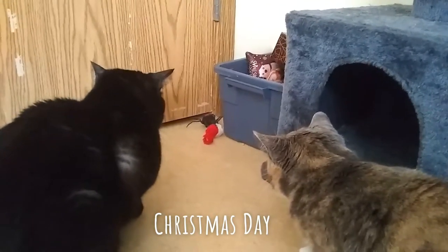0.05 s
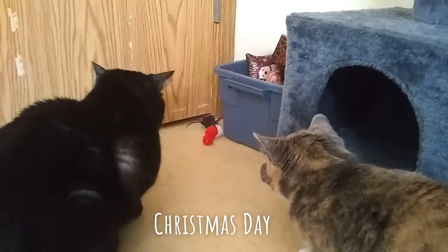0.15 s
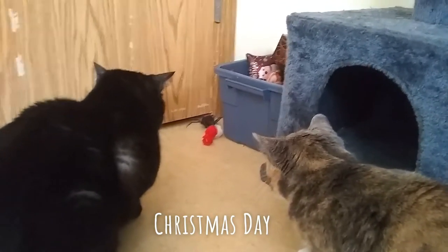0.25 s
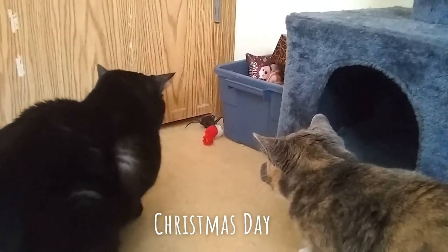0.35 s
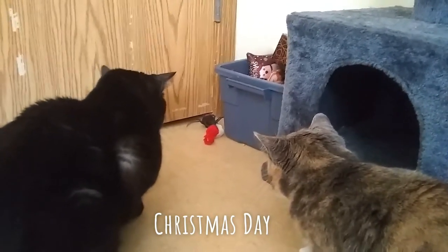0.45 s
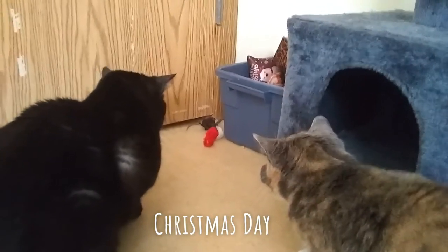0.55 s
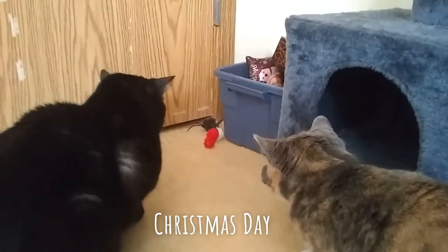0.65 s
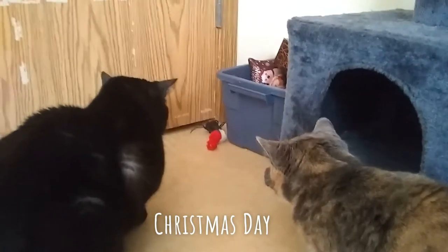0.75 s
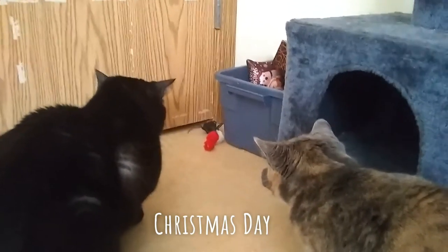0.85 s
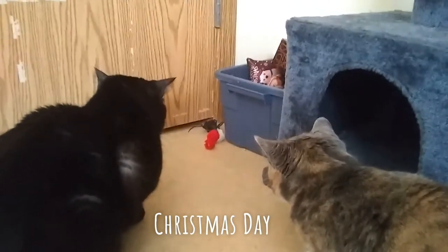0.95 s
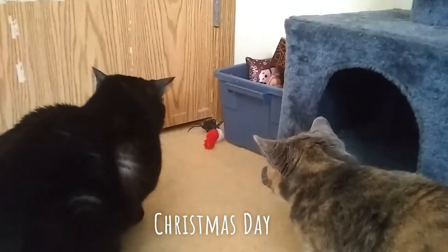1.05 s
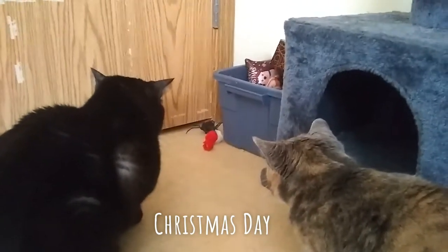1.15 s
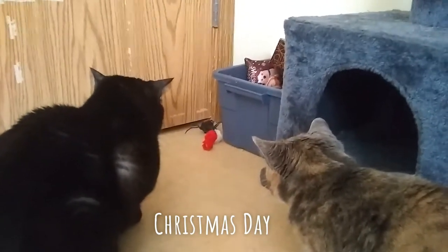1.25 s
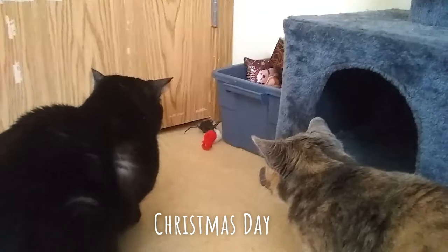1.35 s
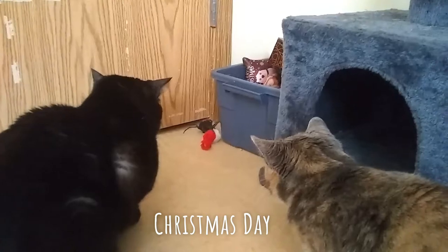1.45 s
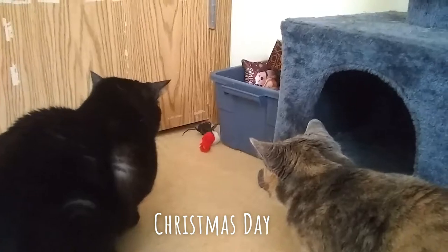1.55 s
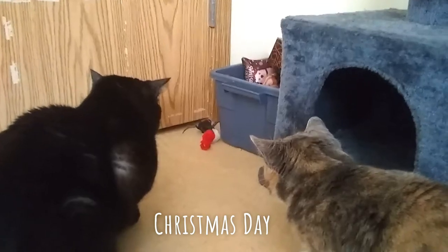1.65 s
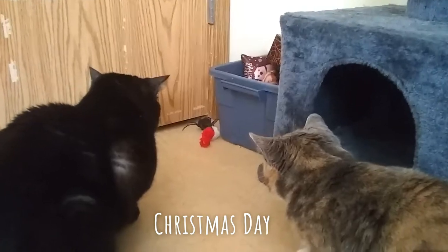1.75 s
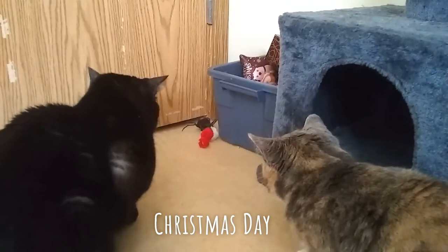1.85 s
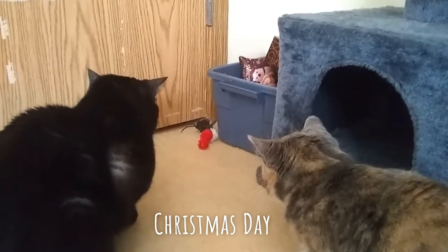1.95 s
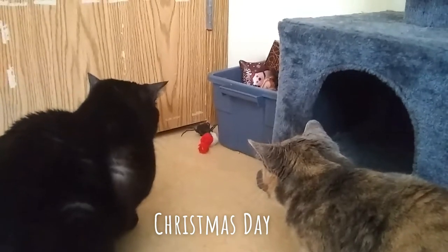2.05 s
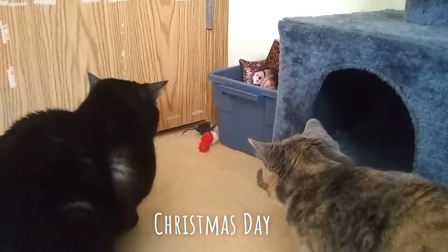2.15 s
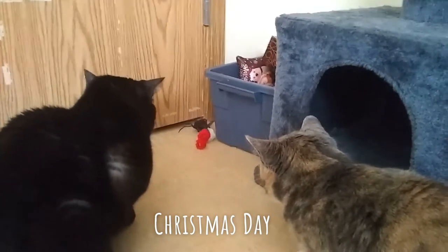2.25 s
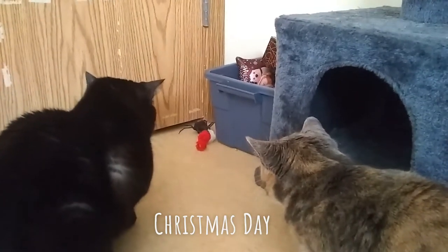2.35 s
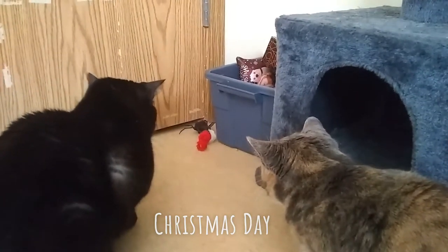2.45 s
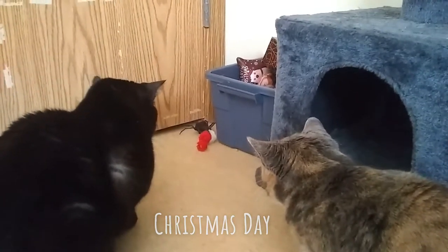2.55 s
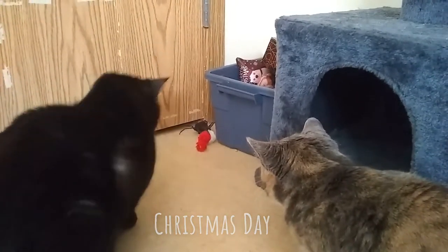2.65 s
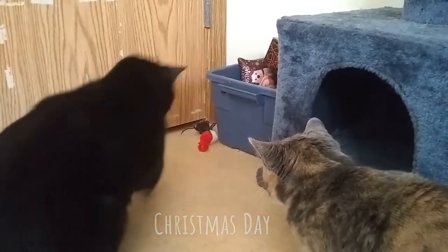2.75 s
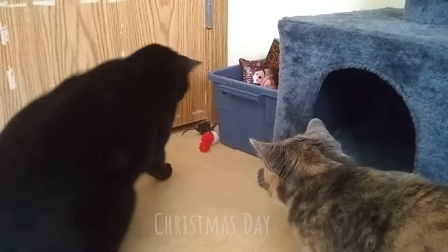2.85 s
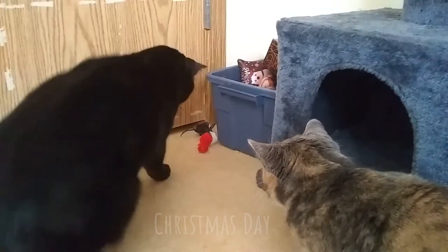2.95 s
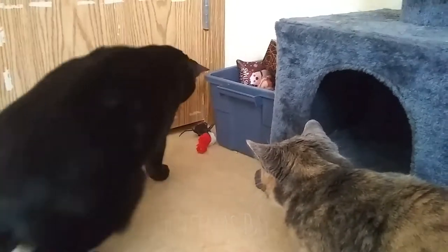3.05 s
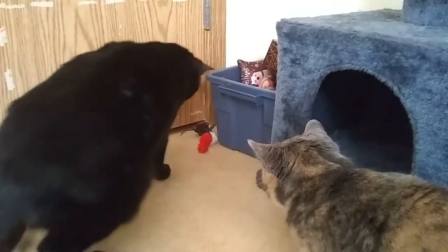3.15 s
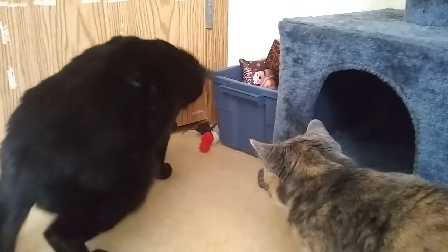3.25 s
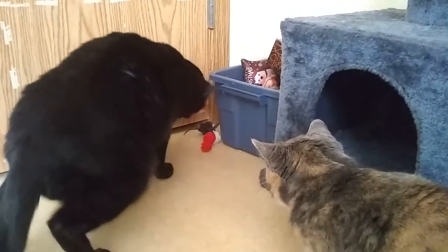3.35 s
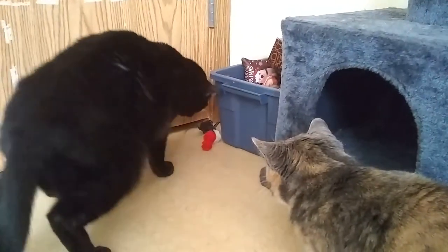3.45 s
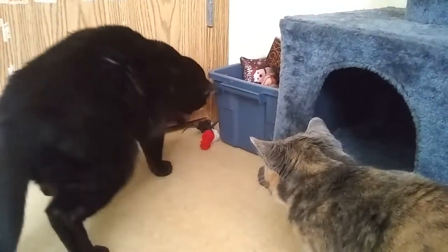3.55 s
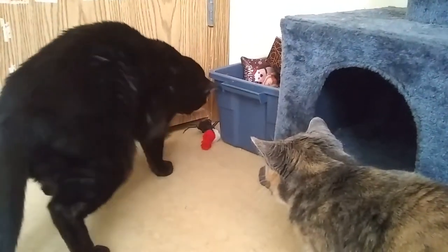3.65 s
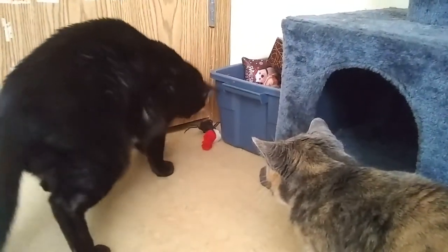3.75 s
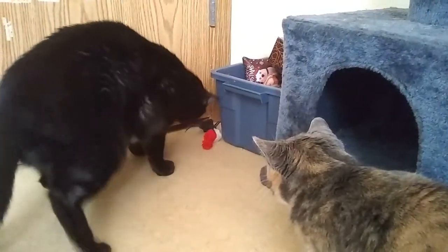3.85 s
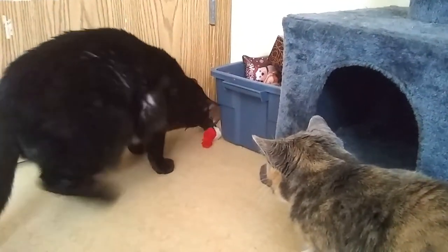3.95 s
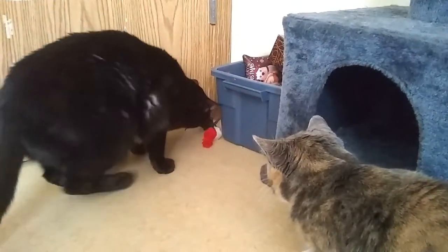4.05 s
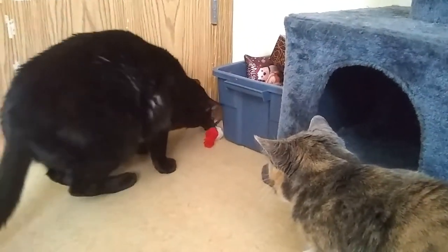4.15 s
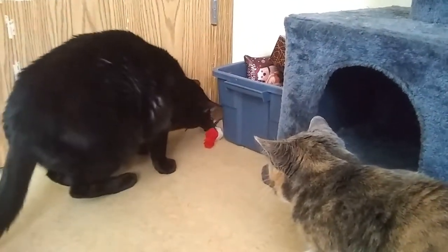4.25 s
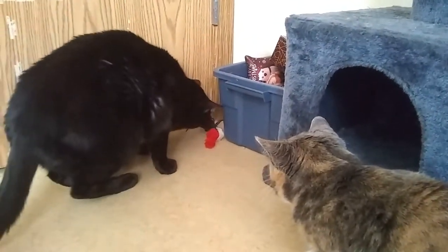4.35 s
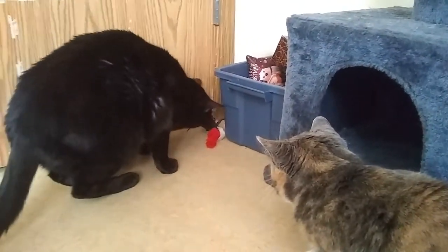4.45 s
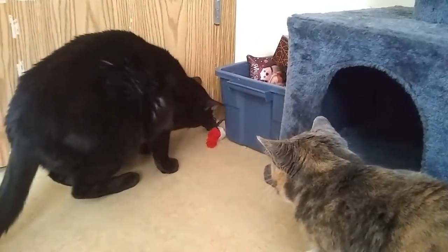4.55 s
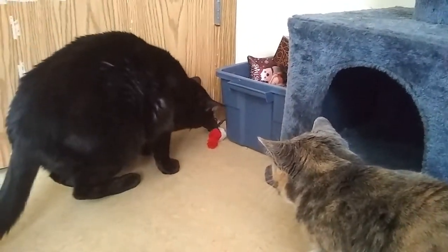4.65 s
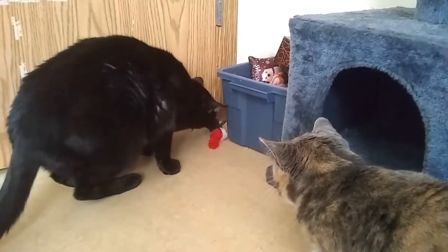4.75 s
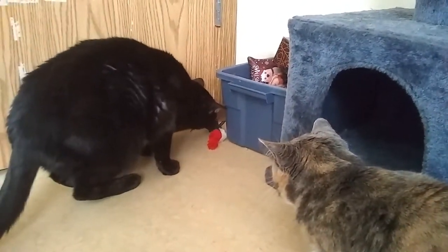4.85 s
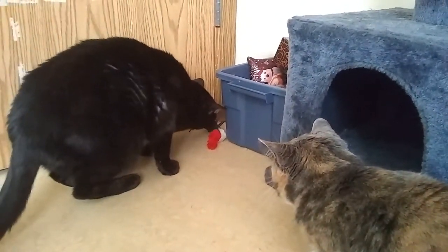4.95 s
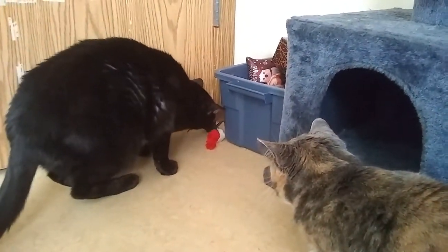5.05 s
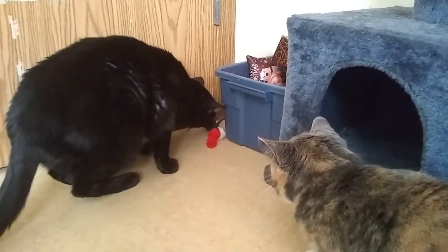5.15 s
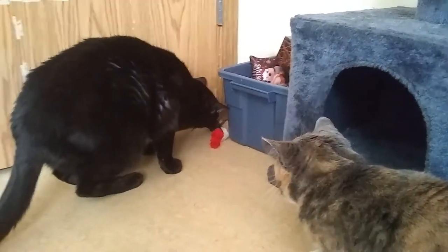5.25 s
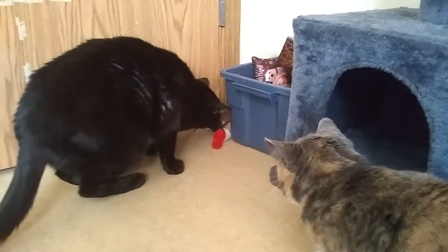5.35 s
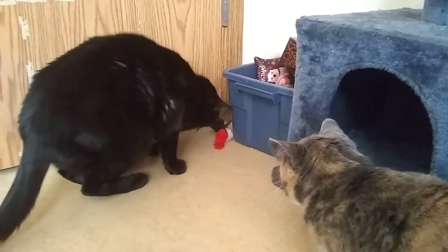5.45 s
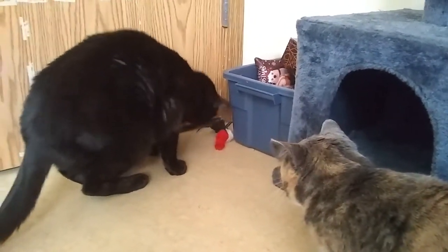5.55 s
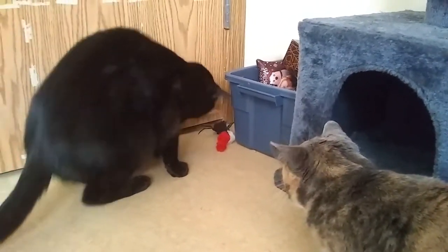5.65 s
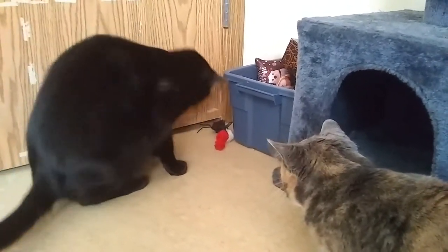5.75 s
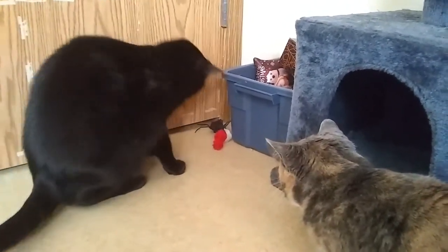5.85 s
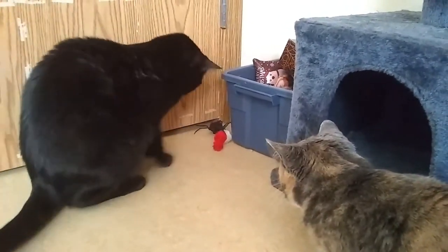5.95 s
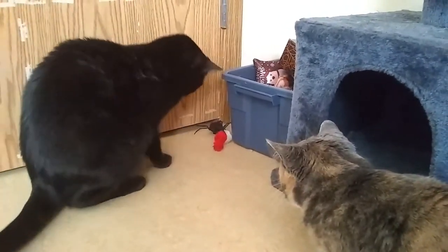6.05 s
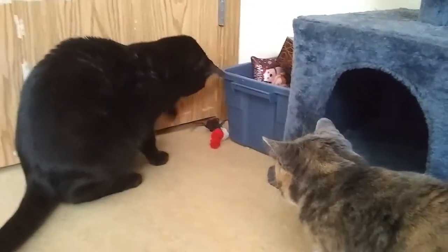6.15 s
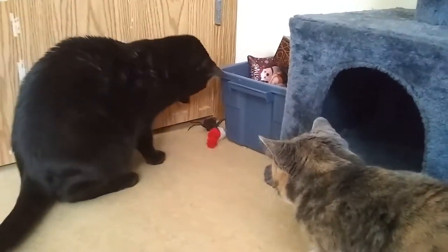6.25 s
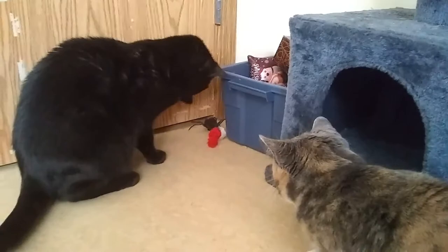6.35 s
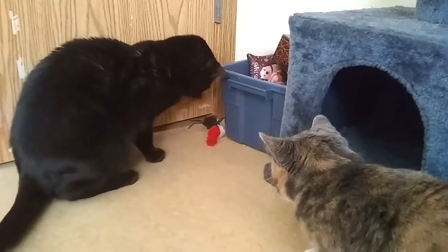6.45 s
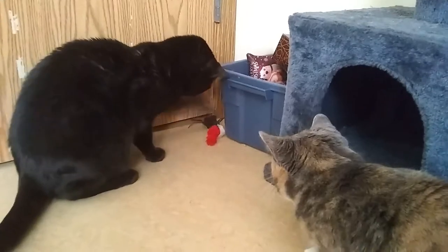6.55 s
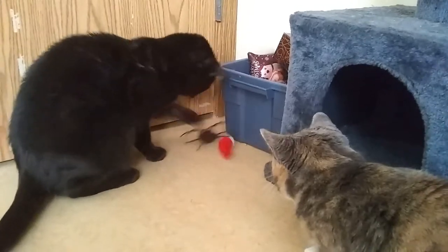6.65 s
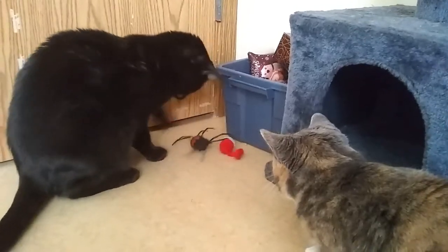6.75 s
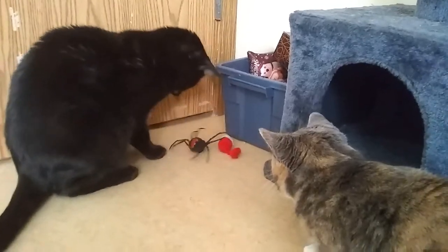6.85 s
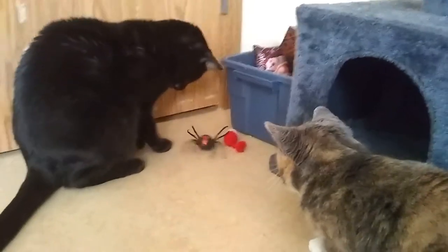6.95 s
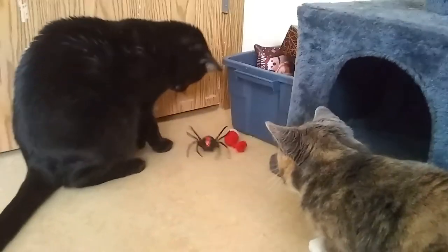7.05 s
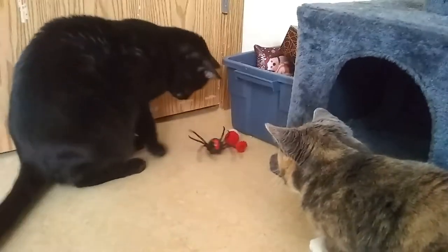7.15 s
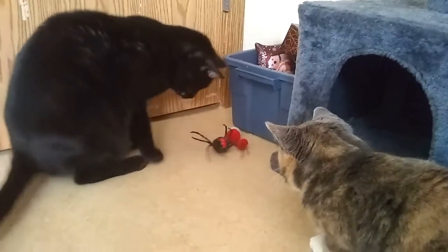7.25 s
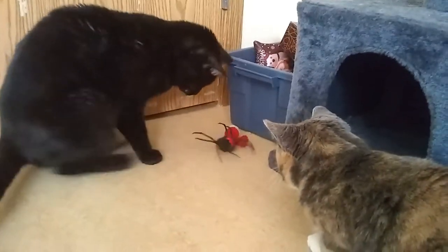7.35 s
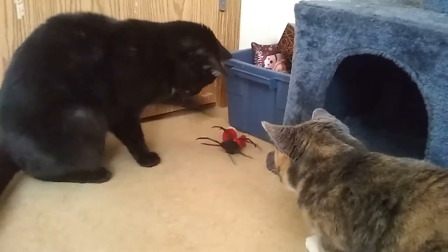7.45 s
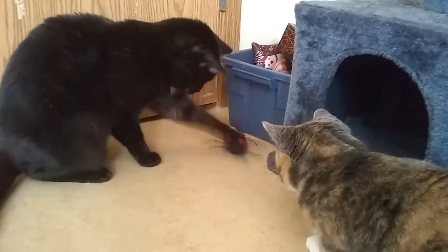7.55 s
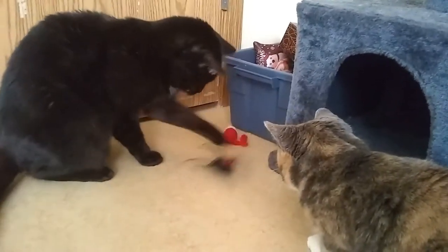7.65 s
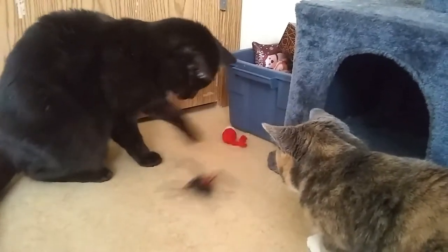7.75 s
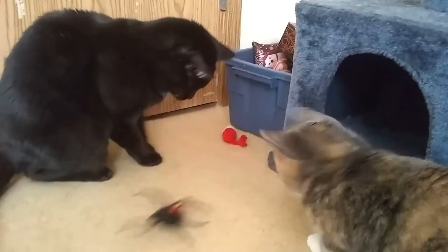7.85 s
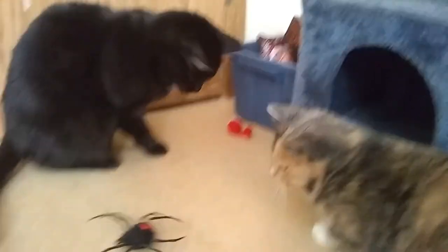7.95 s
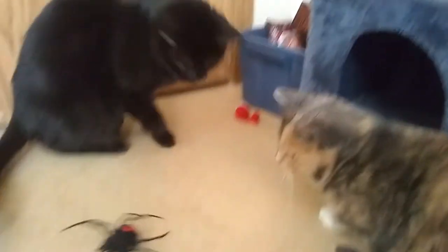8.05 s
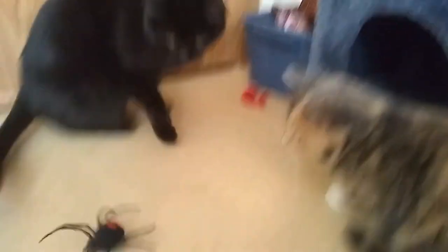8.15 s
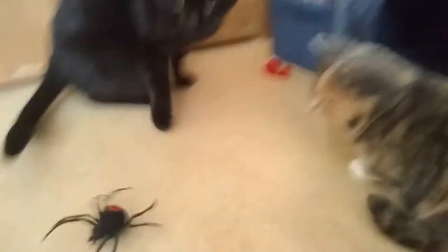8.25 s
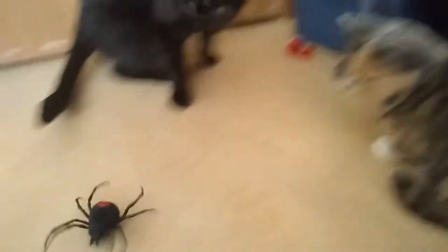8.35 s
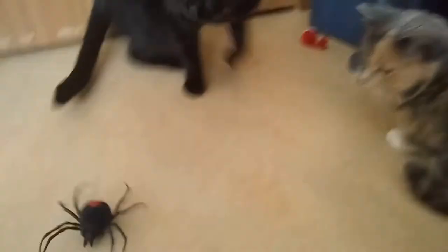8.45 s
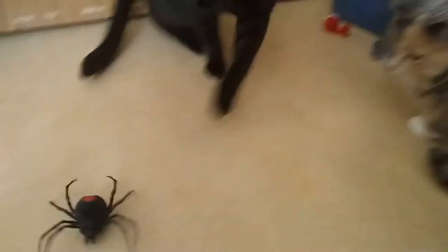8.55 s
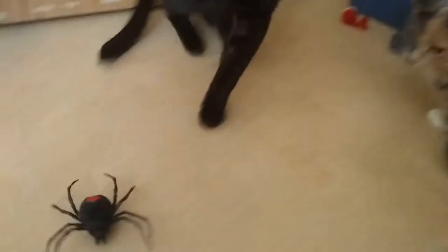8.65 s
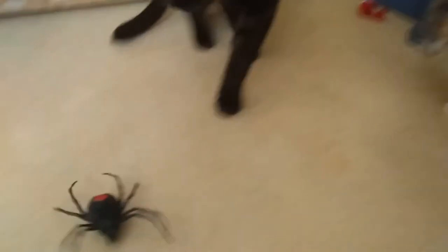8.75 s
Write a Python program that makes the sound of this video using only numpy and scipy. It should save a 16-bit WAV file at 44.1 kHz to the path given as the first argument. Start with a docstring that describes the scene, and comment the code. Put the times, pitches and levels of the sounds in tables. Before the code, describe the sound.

Indoors in a small room, a battery-driven toy whirrs constantly with fast, gritty plastic gears that surge unevenly. Its legs tap and rub lightly on a wooden door, sometimes snapping free. A paw knocks it into the door with a sharp clack and short woody thud; then it rattles more loosely, is flicked away, and crosses right to left towards the close stereo microphone.

```python
"""A motorised toy spider scrabbles at a wooden door: motor hum, whirring gears that surge with each stride and
lurch, legs that tap and rub the wood and now and then snap free. At 6.65 s a cat's paw knocks it into the door:
a filtered-noise drag, a juddering shell, a thud of panel modes. Its freed linkage then chatters ever looser; at
7.7 s a paw flicks it away, and it crosses from right to left and comes close, whirring louder.
Room air and a steady appliance hum lie underneath throughout; a stereo widener spreads the toy."""
import sys
import numpy as np
from scipy import signal
from scipy.fft import rfft, irfft, next_fast_len
from scipy.io import wavfile
from scipy.ndimage import map_coordinates

SR = 44100
rng = np.random.default_rng(int(sys.argv[2]) if len(sys.argv) > 2 else 0)


def generate_wav(sig):
    """Save sig (samples, or channels by samples) to the path in sys.argv[1] as 16-bit PCM at SR."""
    pcm = np.round(np.clip(np.atleast_2d(sig).T, -1, 1) * 32767).astype(np.int16)
    wavfile.write(sys.argv[1], SR, pcm)


N = 388080
TIME = np.arange(N) / SR


def amp(db):
    """Decibels to gain."""
    return 10 ** (np.asarray(db) / 20)


def unit(x):
    """Scale to rms 1."""
    return x / np.sqrt(np.mean(x ** 2) + 1e-20)


def along(points, hz):
    """Read (frequency, value) points on a log frequency axis."""
    f, v = np.transpose(points)
    return np.interp(np.log(hz + 1), np.log(f + 1), v)


def curves(rows):
    """One value per sample for each column after the time."""
    s, *cols = np.transpose(rows)
    return [np.interp(TIME, s, c) for c in cols]


def wobble(rate):
    """A smooth random curve, rate knots a second."""
    return map_coordinates(rng.standard_normal(int(N * rate / SR) + 4), [TIME * rate])


def filtered(x, response):
    """x times a complex response of frequency."""
    m = next_fast_len(N + SR // 2)
    return irfft(rfft(x, m) * response(np.fft.rfftfreq(m, 1 / SR)), m)[..., :N]


def ring(x, spectrum, low_hz, size=2048):
    """x through a causal (minimum-phase) body with this spectrum, which radiates little below low_hz."""
    hz = np.fft.rfftfreq(size, 1 / SR)
    radiated = hz ** 2 / (hz ** 2 + low_hz ** 2)
    cepstrum = irfft(np.log(amp(along(spectrum, hz)) * radiated + 1e-6))
    # folding the cepstrum forward in time makes the response causal
    cepstrum[1:size // 2] *= 2
    cepstrum[size // 2 + 1:] = 0
    response = irfft(np.exp(rfft(cepstrum)))
    return signal.fftconvolve(x, response / np.linalg.norm(response))[:N]


def impacts(turns, scatter, spread_db, count):
    """count loose contacts per shaft turn, uneven in time and strength."""
    marks = np.arange(int(turns[-1] * count)) / count
    late, size = rng.standard_normal((2, len(marks)))
    at = np.interp(marks + scatter * late, turns, np.arange(N)).astype(int)
    strength = amp(spread_db * np.minimum(size, 2)) * rng.choice([-1, 1], len(at))
    return unit(np.bincount(at, strength, N))


def blows(rows, t60, scuff):
    """Each contact is a sharp push and a brief scuff of dying noise."""
    out, t = np.zeros(N + SR), np.arange(SR // 10) / SR
    for s, db in rows:
        push = scuff * unit(rng.standard_normal(len(t)) * amp(-60 * t / t60)) / np.sqrt(len(t))
        push[0] += 1
        out[round(s * SR):][:len(t)] += amp(db) * push
    return out[:N]


def swells(rows, rise, life):
    """Power of short swells that rise quickly and die away."""
    power, t = np.zeros(N), np.arange(SR // 5) / SR
    for s, db in rows:
        power[min(round(s * SR), N - 1)] += amp(db) ** 2
    return np.abs(signal.fftconvolve(power, np.exp(-t / life) * (1 - np.exp(-t / rise)))[:N])


def sum_difference(pair):
    """Mid and side to left and right, or twice the reverse."""
    return np.array([pair[0] + pair[1], pair[0] - pair[1]])


def aside(x, side_db):
    """A source's share of the side signal."""
    return np.array([np.zeros(N), amp(side_db) * x])


# reverb decay of the room: (frequency [Hz], t60 [s])
ROOM_DECAY = [(200, 0.28), (3000, 0.1), (12000, 0.14)]


def room(x, wet_db, size=16384):
    """Direct sound in the middle and diffuse reflections that keep changing, as mid and side."""
    hop = size // 2
    starts = np.arange(0, N + hop, hop)
    padded = np.pad(x, (hop, 2 * size))
    pieces = padded[starts[:, None] + np.arange(size)] * np.sin(np.pi * np.arange(size) / size)
    # each overlapping piece gets its own noise tail
    hz, t, z = signal.stft(rng.standard_normal((len(starts), 2, hop)), SR, nperseg=256)
    decay = amp(-60 * t / along(ROOM_DECAY, hz)[:, None])
    tails = signal.istft(z * decay, SR, nperseg=256)[1]
    tails = tails / np.linalg.norm(tails, axis=2, keepdims=True)
    echoes = signal.fftconvolve(pieces[:, None], tails, axes=2)
    wet = np.zeros((2, N + 4 * size))
    for start, echo in zip(starts, echoes):
        wet[:, start:start + echo.shape[1]] += echo
    return np.array([x, np.zeros(N)]) + amp(wet_db) * wet[:, hop:hop + N]


# nominal speed of the motor shaft: (time [s], turns per second [Hz])
MOTOR_SPEED = [(0, 145), (.5, 147), (1.9, 143.9), (2.6, 147.6), (3.1, 143.6), (4.4, 147.8), (5.2, 147.4),
               (6, 144), (6.6, 143.6), (6.95, 155.5), (7.4, 151.4), (7.8, 148), (8.2, 143.5), (8.8, 144.8)]


def motor_turns():
    """The shaft's running count of turns, its speed slightly unsteady; it drives every moving part."""
    return np.cumsum(curves(MOTOR_SPEED)[0] * (1 + .004 * wobble(12))) / SR


# the motor is geared down to the legs, and the body rocks once in a few strides
TURNS_PER_STRIDE, TURNS_PER_ROCK = 12.81, 50.8
STRIDE_PHASE, ROCK_PHASE = 0.52, 0.61  # share of a cycle at which the load peaks


def strides(turns, scatter):
    """The time of each stride, a little uneven."""
    marks = (np.arange(int(turns[-1] / TURNS_PER_STRIDE)) + STRIDE_PHASE) * TURNS_PER_STRIDE
    return np.interp(marks + scatter * TURNS_PER_STRIDE * rng.standard_normal(len(marks)), turns, TIME)


SURGE_DB, ROCK_DB = -46, 8  # a stride's relative load on the gears, its swing with the rocking
# the gears bite as the toy lurches: (time [s], relative level [dB])
LURCHES = [(0.136, -35), (0.246, -38), (0.584, -30), (0.71, -34), (0.967, -31), (1.131, -34), (1.472, -37),
           (1.557, -37), (2.077, -34), (2.155, -33.5), (2.25, -36), (2.378, -43), (2.776, -34),
           (3.013, -32.5), (3.108, -29.5), (3.407, -31.5), (3.684, -31.5), (3.808, -34), (4.012, -34.5),
           (4.384, -33.5), (4.526, -33.5), (4.637, -29.5), (4.713, -34), (4.882, -37), (5.172, -32),
           (5.297, -28), (5.507, -31.5), (5.723, -40), (5.846, -31.5), (5.922, -37), (6.215, -35),
           (6.369, -33), (6.476, -29), (7.114, -31), (7.254, -33.5), (7.413, -34), (7.515, -30.5),
           (7.779, -31.5), (7.85, -33.5), (7.916, -33), (8.179, -33), (8.246, -32), (8.414, -40),
           (8.598, -43), (8.687, -37)]


def gear_load(turns):
    """Surges (s, dB): a light one per stride, swinging as the body rocks, and the harder lurches."""
    rock = np.cos(2 * np.pi * (turns / TURNS_PER_ROCK - ROCK_PHASE))
    steps = [(s, SURGE_DB + ROCK_DB * rock[int(s * SR)]) for s in strides(turns, scatter=0.13)]
    return steps + list(LURCHES)


# colour of the plastic shell: (frequency [Hz], relative level [dB])
SHELL_COLOUR = [(900, -14), (1500, -12.5), (2100, -6), (2600, 1), (2950, -1.75), (3300, -10.5), (3750, -7),
                (4650, -9), (5400, -6), (6300, -7), (7200, -6.5), (8700, -11.5), (9900, -8), (10550, -7),
                (11100, -8.5), (12000, -11.5), (13300, -17), (14500, -30)]
# ringing of the nook between door and storage bin: (frequency [Hz], width [Hz], gain [ratio])
NOOK_MODES = [(2570, 13, 0.15), (2640, 11, 0.39), (2905, 7.2, 0.93), (2998, 12, 1.35), (3030, 26, 0.61),
              (3477, 77, 0.82)]


def gear_noise(turns, spread_db, rub):
    """Teeth rattle and rub in the shell, loaded once a turn; the nook rings, fading out after the knock."""
    load = amp(1.6 * np.cos(2 * np.pi * turns) + 2.8 * wobble(150))
    rattle = impacts(turns, scatter=.06, spread_db=spread_db, count=7)
    drive = load * (rattle + rub * rng.standard_normal(N))
    shell = unit(ring(drive, SHELL_COLOUR, low_hz=866))

    def resonances(hz):
        return sum(g * 1j * hz * w / (c * c - hz * hz + 1j * hz * w) for c, w, g in NOOK_MODES)
    return shell + filtered(shell, resonances) * np.clip((KNOCK[0][0] - TIME) / 0.51 + 1, 0, 1)


# steady whirr, louder as the toy nears: (time [s], relative level [dB])
WHIRR_LEVEL = [(0.05, -46.5), (0.82, -45.5), (1.62, -46.5), (3.1, -46), (3.55, -47.5), (3.9, -45.5),
               (4.28, -49), (4.55, -47.5), (5.6, -46), (7.12, -45), (7.37, -44), (8.07, -45.5),
               (8.4, -43.5), (8.78, -41)]
WHIRR_DB = 6  # lift of the whole whirr over that table
# the highest fizz, dulled while the cat leans over the toy: (time [s], level relative to the whirr [dB])
FIZZ_LEVEL = [(0, -3.5), (3.2, -1.5), (4.2, -4), (5.4, -5.5), (6.2, -3.5), (7.5, -5), (8.1, -1),
              (8.8, -2.5)]


def gearbox(turns):
    """The big gears whirr and surge with each lurch; the smaller ones hiss and fizz more evenly."""
    steady = amp(curves(WHIRR_LEVEL)[0] + WHIRR_DB) ** 2
    surge = swells(gear_load(turns), rise=0.0022, life=0.012)

    def above(hz, edge):
        return 1 / (1 + (edge / (hz + 1)) ** 8)
    whirr = filtered(gear_noise(turns, spread_db=4.0, rub=0.93), lambda hz: np.sqrt(1 - above(hz, 4380)))
    hiss = filtered(gear_noise(turns, spread_db=5.0, rub=0.68),
                    lambda hz: np.sqrt(above(hz, 3670) * (1 - above(hz, 7020))))
    fizz = filtered(gear_noise(turns, spread_db=5.0, rub=1.14), lambda hz: np.sqrt(above(hz, 7940)))
    whirr = whirr * np.sqrt(steady + 0.73 * surge)
    hiss = hiss * np.sqrt(steady + 0.13 * surge) * amp(1.6 * wobble(160))
    fizz = fizz * np.sqrt(steady + 0.21 * surge) * amp(curves(FIZZ_LEVEL)[0] + 2)
    direct = amp(-6) * (whirr + hiss + fizz)
    # the far side of the body is heard only by way of the side walls
    wash = amp(-6.5) * np.sqrt(steady + 0.56 * surge) * gear_noise(turns, spread_db=-2.0, rub=0.88)
    return room(direct, wet_db=-2.5) + aside(wash, side_db=1.0)


# the linkage is nearly still while the door holds the legs, and shakes loose once they run free
HELD_DB, FREE_DB, LOOSEN_S = -71, -35, 0.33  # relative levels, time to loosen
# the loudest ticks of the linkage: (time [s], relative level [dB])
HARD_TICKS = [(7.6572, -20), (8.4224, -19), (8.438, -20), (8.5151, -19), (8.6105, -15.5), (8.6935, -18),
              (8.7491, -19)]


def linkage(turns, ring_hz, life, spread_db):
    """A loose link ticks in one short plastic resonance, now and then hard; it grows with whirr and lurch."""
    t = np.arange(SR // 100) / SR
    tick = np.sin(2 * np.pi * ring_hz * t) * (t * t) * np.exp(-t / life)
    contacts = impacts(turns, scatter=0.092, spread_db=spread_db, count=7)
    chatter = unit(signal.fftconvolve(contacts, tick)[:N])
    hard = signal.fftconvolve(blows(HARD_TICKS, t60=.01, scuff=0), tick / np.abs(tick).max())[:N]
    free = np.clip((TIME - KNOCK[0][0]) / LOOSEN_S, 0, 1)
    whirr_db = curves(WHIRR_LEVEL)[0]
    level_db = HELD_DB + (FREE_DB - HELD_DB) * free + 1.8 * (whirr_db - whirr_db.mean())
    lurch = swells(LURCHES, rise=.002, life=0.0089) / amp(whirr_db + WHIRR_DB) ** 2
    return amp(level_db) * np.sqrt(0.19 + 0.12 * lurch) * chatter + amp(5) * hard


# caught legs snapping free: (time [s], relative level [dB])
LEG_SNAPS = [(0.4203, -36), (0.5563, -33), (3.0127, -30.5), (3.4082, -41), (4.6385, -36), (4.6525, -39),
             (4.886, -38), (4.9686, -34.5), (5.133, -40), (5.506, -35.5), (5.659, -42), (5.722, -37),
             (6.0205, -30.5), (6.1087, -30.5)]
# the cat's paw strikes the shell, or the shell strikes the door: (time [s], relative level [dB])
SWATS = [(6.6258, -30), (6.6522, -21.5), (7.5956, -29.5), (7.656, -28.5)]
# colour of a plastic snap: (frequency [Hz], relative level [dB])
SNAP_COLOUR = [(900, -13), (3000, 1), (4500, -5), (10000, -5.5), (14000, -18)]
SNAP_RISE_S, SNAP_DB = .0008, -2.5  # time constant of the burst, its level against the tables


def snaps(rows):
    """Plastic slips over an edge: a rounded noise burst of a few milliseconds."""
    out, t = np.zeros(N + SR), np.arange(SR // 50) / SR
    swell = t * t * np.exp(-t / SNAP_RISE_S)
    for s, db in rows:
        out[round(s * SR):][:len(t)] += amp(db + SNAP_DB) * swell / swell.max() * rng.standard_normal(len(t))
    return ring(out[:N], SNAP_COLOUR, low_hz=700)


# kicks of the legs against the door, about one a stride: (time [s], relative level [dB])
KICKS = [(0.018, -41), (0.096, -53), (0.161, -50), (0.224, -46), (0.34, -47.5), (0.492, -51), (0.714, -46),
         (0.791, -41), (0.883, -41.5), (0.96, -60), (1.008, -48.5), (1.102, -41), (1.289, -51),
         (1.406, -59), (1.459, -44), (1.557, -49), (1.608, -48.5), (1.75, -47), (1.874, -47), (1.943, -45),
         (2.041, -46), (2.083, -49), (2.125, -46.5), (2.203, -46.5), (2.253, -45.5), (2.305, -47),
         (2.435, -44), (2.502, -50), (2.64, -45.5), (2.731, -40.5), (2.854, -48), (2.933, -45),
         (2.999, -52), (3.066, -46.5), (3.19, -51), (3.262, -46.5), (3.356, -44.5), (3.446, -42),
         (3.498, -54), (3.556, -46), (3.641, -57), (3.754, -44.5), (3.942, -45), (4.0, -44.5), (4.093, -41),
         (4.192, -42.5), (4.305, -51), (4.441, -55), (4.531, -52), (4.611, -50), (4.689, -52), (4.785, -48),
         (4.84, -43.5), (4.888, -43.5), (5.039, -46), (5.153, -49), (5.251, -49), (5.311, -48.5),
         (5.38, -48), (5.52, -50), (5.564, -47.5), (5.661, -41), (5.744, -44), (5.854, -45.5), (5.901, -46),
         (5.946, -42.5), (6.093, -45), (6.171, -60), (6.274, -44), (6.476, -48.5)]
# the door's short woody notes under a kick: (frequency [Hz], relative level [dB])
KICK_NOTES = [(560, -13), (630, -3), (705, -1), (790, -12)]
# colour of the door under light legs: (frequency [Hz], relative level [dB])
LIGHT_COLOUR = [(100, -18.5), (230, -4), (400, -1), (520, 3.5), (700, 3.5), (850, -5), (1050, -1),
                (1400, -13), (1800, 3), (2300, -48), (5000, -46)]
KICK_RING_DB, KICK_SCUFF_DB = 1, 8.5  # woody note and scuff against the table
KICK_T60_S, KICK_ATTACK_S = 0.072, 0.0032
KICK_VARY_DB, KICK_DETUNE = 3.5, 0.032  # each kick lands on another spot


def kicks():
    """A kick sounds the door's short woody notes, in a new mix each time, with a little scuff."""
    out, t = np.zeros(N + SR), np.arange(SR // 10) / SR
    hz, note_db = np.transpose(KICK_NOTES)
    fade = amp(-60 * t / KICK_T60_S) * (1 - np.exp(-t / KICK_ATTACK_S))
    for s, db in KICKS:
        mix = amp(note_db + KICK_VARY_DB * rng.standard_normal(len(hz)))
        detuned = hz * (1 + KICK_DETUNE * rng.standard_normal())
        cycles = np.outer(detuned, t) + rng.random((len(hz), 1))
        notes = mix / np.linalg.norm(mix) @ np.sin(2 * np.pi * cycles)
        out[round(s * SR):][:len(t)] += amp(db + KICK_RING_DB) * fade * notes
    scuffs = blows([(s, db + KICK_SCUFF_DB) for s, db in KICKS], t60=0.061, scuff=4.5)
    return out[:N] + ring(scuffs, LIGHT_COLOUR, low_hz=249)


PATTER_DB = -60.5  # the legs rub on the door between kicks
# the soft thump of the paw that flicks the toy away: (time [s], relative level [dB])
FLICK = [(7.657, -34)]


def scrabble(turns):
    """Light legs rub on the door until the knock frees the toy; later a paw flicks it away."""
    contacts = impacts(turns, scatter=0.2996, spread_db=7.5, count=4)
    patter = unit(ring(contacts, LIGHT_COLOUR, low_hz=123))
    flick = ring(blows(FLICK, t60=0.096, scuff=3.1), LIGHT_COLOUR, low_hz=247)
    return amp(PATTER_DB) * patter * (TIME < KNOCK[0][0]) + flick


DRAG_DB, DRAG_S = -41, 0.03  # the toy is dragged along the door just before it hits
# the body judders against the door: spacing, loss each time, first contact, its delay behind the legs
REBOUND_S, REBOUND_LOSS_DB, REBOUND_DB, BODY_LAG_S = .0047, 5, 11.5, .0022
# the paw drives the toy into the door: (time [s], relative level [dB])
KNOCK = [(6.654, -14)]
# modes of the door panel: (frequency [Hz], relative level [dB], t60 [s])
DOOR_MODES = [(201, -3.5, 0.098), (241, 3, 0.088), (303, 0, 0.08), (363, -2, 0.1), (432, -3, 0.11),
              (535, -1, 0.08), (633, -4.5, 0.088), (733, -11, 0.09), (950, -12, 0.14), (1120, -10, 0.08),
              (1516, 4, 0.027)]
# colour of the door under the plastic body: (frequency [Hz], relative level [dB])
SCRAPE_COLOUR = [(60, -19), (130, -4), (290, 8), (420, 0.5), (700, -1.5), (1100, -7), (1700, -12),
                 (2300, -25), (5000, -24)]


def knock():
    """The plastic body drags along the door, hits it and judders; the panel thuds briefly in its modes."""
    out, t = np.zeros(N + SR), np.arange(SR // 2) / SR
    (s, db), = KNOCK
    modes = sum(amp(level - 60 * t / t60) * np.sin(2 * np.pi * hz * t) * (-1) ** k
                for k, (hz, level, t60) in enumerate(DOOR_MODES))
    out[round(s * SR):][:len(t)] = amp(db - 14) * modes * (1 - np.exp(-t / 0.0026))
    rebounds = [(s + BODY_LAG_S + k * REBOUND_S, db + REBOUND_DB - REBOUND_LOSS_DB * k) for k in range(8)]
    judder = ring(blows(rebounds, t60=0.013, scuff=0.6), SCRAPE_COLOUR, low_hz=90)
    rub = amp(DRAG_DB) * (TIME > s - DRAG_S) * amp(-60 * np.maximum(TIME - s, 0) / 0.47)
    return out[:N] + judder + rub * unit(ring(rng.standard_normal(N), SCRAPE_COLOUR, low_hz=600))


def motor_hum(turns):
    """The motor's unbalance hums once a turn, its level wavering."""
    return amp(-70.0 + 1.3 * wobble(6.6)) * unit(np.sin(2 * np.pi * turns))


# colour of the room air, mid and side: (frequency [Hz], relative level [dB])
AIR_MID = [(15, -58), (25, -33), (49, -2), (117, -11.5), (146, -4), (216, -5.5), (316, -8.5), (362, -2),
           (415, -5.5), (1500, -14), (1950, -10.5), (3300, -120)]
AIR_SIDE = [(15, -52), (25, -20), (49, -69), (118, 5), (151, 29), (440, 31), (1070, -59), (1200, -46),
            (1560, -55), (2640, -120)]
# appliance hum: (frequency [Hz], mid level [dB], side level [dB])
APPLIANCE_HUM = [(58, -85.5, -64), (157.2, -72, -64.5), (313.3, -71, -74)]


def background():
    """Room air as coloured noise and a steady appliance hum of sines, as mid and side."""
    air = [amp(db) * unit(filtered(rng.standard_normal(N), lambda hz: amp(along(colour, hz))))
           for colour, db in ((AIR_MID, -62), (AIR_SIDE, -64))]
    hum = sum(amp([[mid_db], [side_db]]) * unit(np.sin(2 * np.pi * (hz * TIME + rng.random())))
              for hz, mid_db, side_db in APPLIANCE_HUM)
    return np.array(air) + hum


NEARS_AT_S, TURN_S = 7.8, 0.31  # the toy comes close; the time its colour takes to shift
# the shell's colour once out of the nook, then close by: (frequency [Hz], gain [dB])
OPEN_TINT = [(1200, -1.5), (1900, 4), (2550, 3.5), (2950, -4.5), (3900, 0.5), (4700, -8), (5550, 3.5),
             (6400, -4), (7300, 0), (10100, -0.5), (12500, -3.5)]
NEAR_TINT = [(1000, -1.5), (1650, 4.5), (2500, -1), (2950, 2), (3750, 3), (5000, -2.5), (8200, -2),
             (10400, 1), (13000, -1)]


def turned(toy):
    """The toy shows the listener another side in each place: at the door, in the open, close by."""
    out_of_nook = np.clip((TIME - KNOCK[0][0]) / TURN_S, 0, 1)
    near = np.clip((TIME - NEARS_AT_S) / TURN_S + .5, 0, 1)
    in_open, close_by = [filtered(toy, lambda hz: amp(along(tint, hz))) for tint in (OPEN_TINT, NEAR_TINT)]
    return (1 - out_of_nook) * toy + out_of_nook * ((1 - near) * in_open + near * close_by)


# the stereo widener: (frequency [Hz], crossfeed share [ratio])
CROSSFEED = [(300, .5), (1100, .9), (2000, .99), (2380, .99), (2950, .32), (3350, .4), (4100, .55),
             (4550, .6), (5400, .35), (6900, .4), (8800, .3), (11200, .35), (13000, .2)]


def widen(pair, delay=0.0004428):
    """Each channel loses a delayed share of the other: opposite combs in mid and side."""
    def combs(hz):
        share = np.clip(along(CROSSFEED, hz), 0, 1)
        cross = share * np.exp(-2j * np.pi * hz * delay)
        return np.array([1 - cross, 1 + cross]) / np.sqrt(1 + share ** 2)
    return filtered(pair, combs)


EXTRA_PATH_M, SOUND_M_PER_S = 0.0031, 343  # the longer way to the left microphone, speed of sound
# the stereo picture narrows for a moment: centre, half length, share left unwidened
NARROW_AT_S, NARROW_FOR_S, NARROW_SHARE = 7.07, 0.7, 0.37
CROSSES_AT_S, CROSSING_S = 7.72, 0.13  # the toy passes from the listener's right to the left
BEARING = np.tanh((TIME - CROSSES_AT_S) / CROSSING_S)  # -1 right, 1 left
# the two microphones colour the toy differently, on the right and then on the left:
# (frequency [Hz], left minus right [dB])
LEAN_RIGHT = [(1100, 0), (1700, 5), (2050, 0), (2400, 0), (2850, -6), (3600, -3), (4600, -.5), (5300, -3.5),
              (6500, 0), (9000, 0), (10500, 2), (13000, 1)]
LEAN_LEFT = [(1100, 0), (1600, 2), (1950, 0), (2500, 0), (2900, 2), (3600, -3), (4600, -.5), (9000, -.5),
             (10500, 3)]


def place(toy):
    """The toy reaches the left microphone later; the pair is widened, and each side has its own colour."""
    def lag(hz):
        return np.exp(np.array([[-1j], [1j]]) * np.pi * hz * EXTRA_PATH_M / SOUND_M_PER_S)
    placed = sum_difference(filtered(sum_difference(toy), lag)) / 2
    narrow = NARROW_SHARE * np.exp(-((TIME - NARROW_AT_S) / NARROW_FOR_S) ** 4)
    pair = sum_difference((1 - narrow) * widen(placed) + narrow * placed)
    right, left = [filtered(pair, lambda hz: amp(np.array([[.5], [-.5]]) * along(lean, hz)))
                   for lean in (LEAN_RIGHT, LEAN_LEFT)]
    return sum_difference(right + (left - right) * (1 + BEARING) / 2) / 2


def scene():
    """One motor drives every moving part of the toy; door, hum and background join unwidened."""
    turns = motor_turns()
    clicks = snaps(LEG_SNAPS + SWATS)
    links = amp(-15) * linkage(turns, ring_hz=2560, life=0.00036, spread_db=12.5)
    toy = gearbox(turns) + room(clicks, wet_db=-5)
    toy += room(links, wet_db=2.0) + aside(links * BEARING, side_db=10.5)
    rest = room(scrabble(turns) + kicks(), wet_db=-11.5) + room(knock(), wet_db=-14) + background()
    rest[0] += motor_hum(turns)
    return sum_difference(place(turned(toy)) + rest)


TOP_HZ = 14350


def record(dry):
    """Nothing is kept above the band limit."""
    return filtered(dry, lambda hz: hz < TOP_HZ)


dry = scene()
out = record(dry)
generate_wav(out)
```